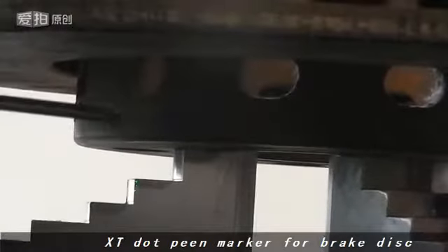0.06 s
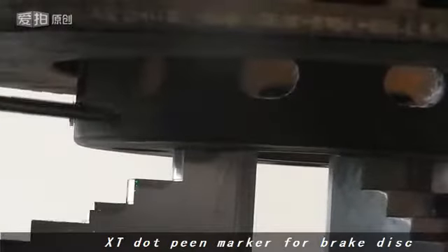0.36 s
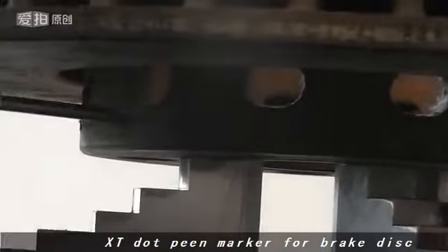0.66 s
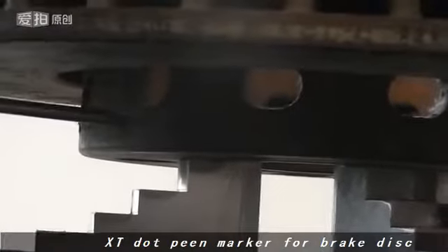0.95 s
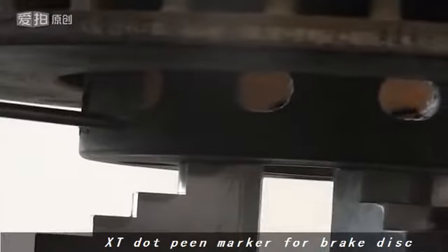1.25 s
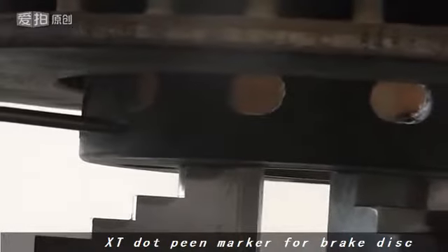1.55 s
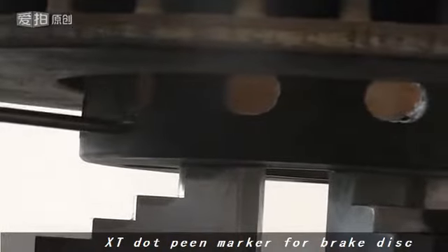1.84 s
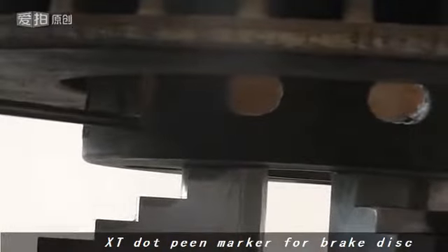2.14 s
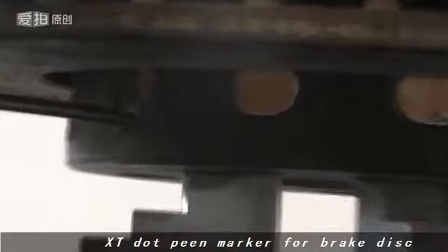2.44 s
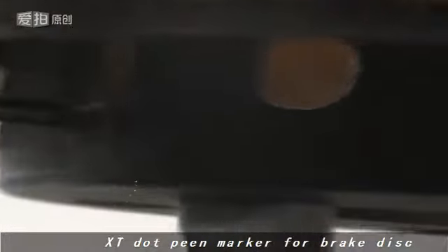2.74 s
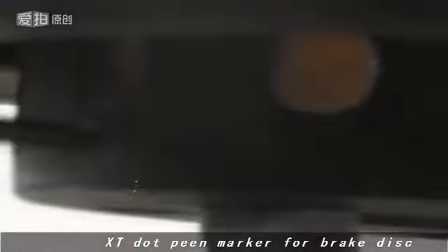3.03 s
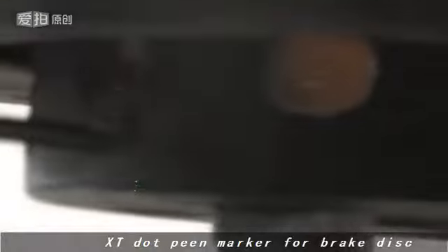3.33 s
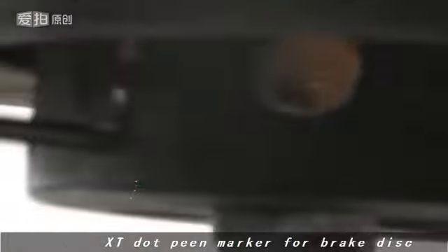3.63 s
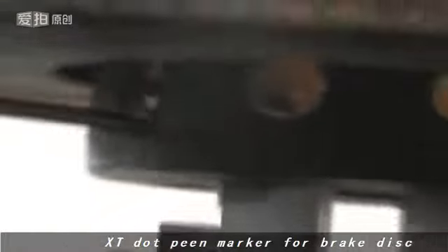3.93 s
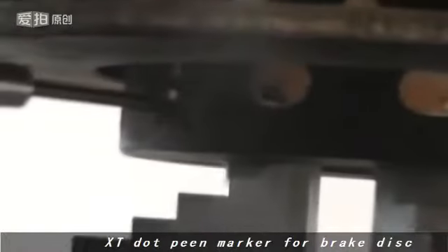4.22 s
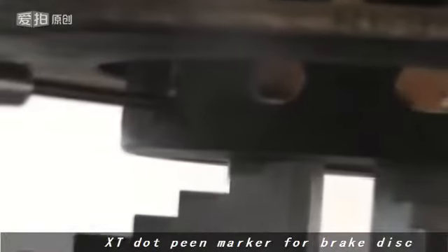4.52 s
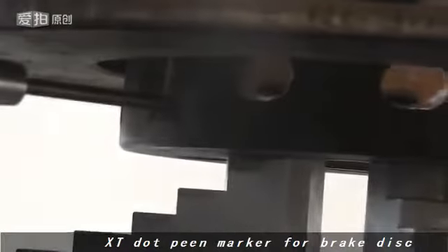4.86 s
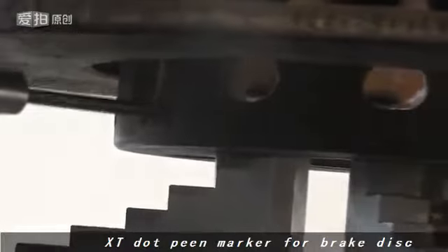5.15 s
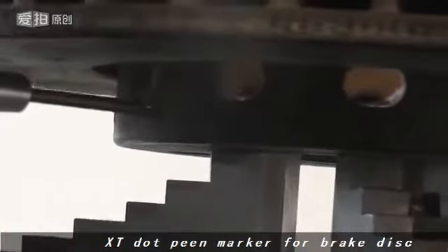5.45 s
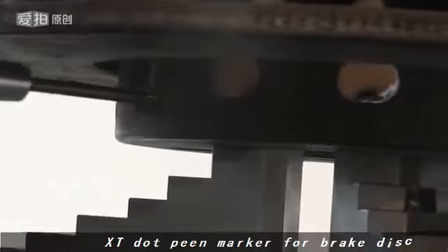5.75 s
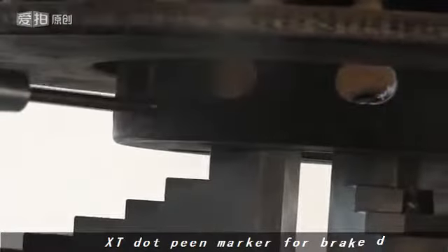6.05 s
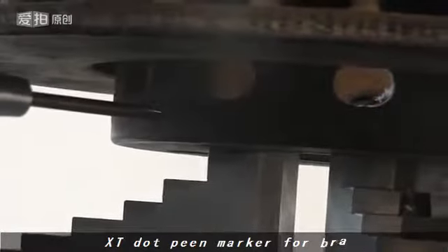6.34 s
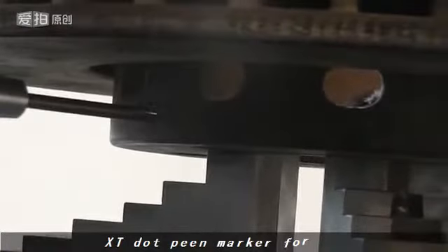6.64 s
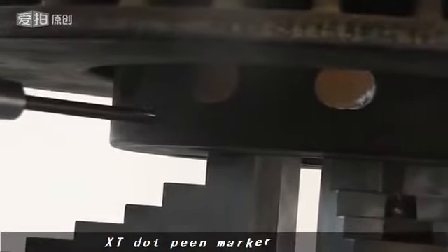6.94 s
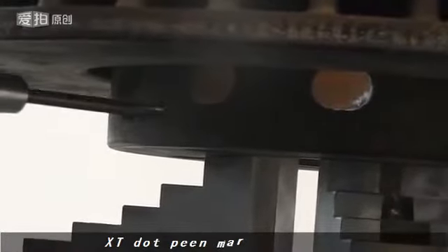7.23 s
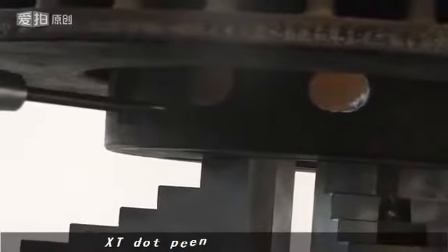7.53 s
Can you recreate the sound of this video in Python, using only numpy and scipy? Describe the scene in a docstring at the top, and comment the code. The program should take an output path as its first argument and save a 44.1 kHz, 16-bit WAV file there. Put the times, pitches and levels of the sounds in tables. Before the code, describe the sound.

A distant machine drones throughout in a slightly echoing workshop, with a faint hiss of leaking air. Close by, a pneumatic marker hammers a steel brake disc so fast that it makes a harsh buzz, with metallic ringing and bright spitting air. One burst cuts off right at the start. Others run from 0.8 to 1.4 seconds, 2.1 to 2.4 and 2.9 to 3.5, then two come almost joined between 4.2 and 4.9. Each opens with a dull knock and leaves a low boom. The drone dips under the bursts and swells back between them. A small positioning motor sounds a steady, low whine from 1.5 to 1.9 seconds and from 2.5 to 2.9. After the last burst, a soft venting hiss swells and fades by about 5.7 seconds. A faint click comes near 7 seconds, as the drone turns slightly rougher, continuing until about 8.

```python
"""A workshop: close by, a pneumatic dot peen marker stamps a brake disc in six bursts.
The stylus hammers about 131 times a second, ringing the steel and spitting air at each stroke.
Each burst opens with a knock and sets the frame booming; in two pauses a stepper motor sings.
A motor-driven machine drones throughout; late on, its colour shifts with the listening position.
Automatic gain control ducks the drone under each burst and lets it swell back in the pauses."""
import sys
import numpy as np
from scipy import signal
from scipy.fft import rfft, irfft
from scipy.io import wavfile
from scipy.ndimage import uniform_filter1d, minimum_filter1d

SR = 44100
rng = np.random.default_rng(int(sys.argv[2]) if len(sys.argv) > 2 else 0)


def to_wav(sig):
    """Store sig (one row per channel, or 1-D mono) as 16-bit WAV at the path in sys.argv[1].

    Samples outside -1..1 are clipped; the rate is SR.
    """
    pcm = np.clip(np.atleast_2d(sig), -1, 1) * 32767
    pcm = np.round(pcm).astype(np.int16)
    wavfile.write(sys.argv[1], SR, pcm.T)  # frames by channels


N = 343098
TIME = np.arange(N) / SR
BIN_HZ = np.fft.rfftfreq(N, 1 / SR)


# Each row: valve opening and shutting in seconds, knock in dB, frame boom in dB, stroke rate in Hz,
# relative blow strength in dB, relative exhaust level in dB.
BURSTS = [(-.5, 0.089, -36, -18, 131.9, -20, -21), (0.839, 1.388, -13, -26.5, 130.7, -22, -21.5),
          (2.051, 2.426, -11, -18.5, 132.1, -24, -23.5), (2.909, 3.494, -17.5, -24.5, 131.4, -22, -23),
          (4.154, 4.507, -14.5, -21, 129.5, -20.5, -21.5), (4.559, 4.926, -13, -25.5, 130.5, -21, -22)]

def marker(scatter_db=2.98, puff_cycles=0.22, leak=0.38, chatter=1.37, close_gain_db=19):
    """Each stroke shakes the head, strikes the steel and lets out a puff of air."""
    rate_hz, blow_db, exhaust_db = stylus_drive()
    turns = np.cumsum(rate_hz * (1 + .004 * wander(90))) / SR
    stroke, cycle = turns.astype(int), turns % 1
    size = amp(scatter_db * rng.standard_normal(2000))[stroke]
    puff = unit_rms(leak + size * np.minimum(cycle / 0.16, 1) * np.exp(-cycle / puff_cycles))
    impact = unit_rms(np.diff(stroke, prepend=0))
    skid = unit_rms(np.exp(-cycle / 0.084) * rng.standard_normal(N))  # the tip digs in
    blows = unit_rms(size * (impact + chatter * skid))
    force = amp(blow_db) * valve(rise_s=0.02, fall_s=0.0096)
    head = head_buzz(turns, rate_hz.mean()) + head_rattle(puff)
    air = amp(exhaust_db) * exhaust(puff)
    return amp(close_gain_db) * (force * head + steel_ring(force * blows) + air)


def stylus_drive(surge_s=.09, surge_hz=3, surge_blow_db=-2, surge_air_db=4, pace_drift=.004):
    """Air stored in the line opens each burst with faster, lighter strokes and more exhaust."""
    opens_s, _, _, _, rate_hz, blow_db, air_db = np.transpose(BURSTS)
    burst = np.maximum(np.searchsorted(opens_s, TIME) - 1, 0)
    surge = np.exp(-(TIME - opens_s[burst]) / surge_s)
    load = wander(16)  # varies along the path of a character
    return (rate_hz[burst] * (1 + pace_drift * wander(11)) + surge_hz * surge,
            blow_db[burst] + surge_blow_db * surge + 0.6 * load,
            air_db[burst] + surge_air_db * surge + 0.2 * load)


def valve(rise_s, fall_s):
    """Air pressure builds when the valve opens and dies away when it shuts."""
    return sum(ramp(on, rise_s) ** 2.2 * tail(off, fall_s) for on, off, *_ in BURSTS)


# Each row: multiple of the stroke rate, relative level in dB.
BUZZ_HARMONICS = [(1, -17), (2, -3.5), (3, -1.5), (4, -4.5), (5, -9), (6, -3.5), (7, -14.5), (8, -17),
                  (9, -18.5), (10, -17), (11, -22), (12, -20), (13, -32), (14, -16), (15, -26), (16, -20.5)]

def head_buzz(turns, rate_hz, gain_db=-1.5):
    """The marking head shakes at multiples of the stroke rate."""
    buzz = sum(amp(db) * partial(turns, round(k), rate_hz, NEAR_WIDTH, 1.4, waver_hz=8.6, drift_rad=0.12)
               for k, db in BUZZ_HARMONICS)
    return amp(gain_db) * unit_rms(buzz)


# Each row: frequency in Hz, relative density in dB.
RATTLE_SPECTRUM = [(41, -53), (70, -35), (198, -10.5), (260, -2), (336, 0), (394, -7), (455, -4),
                   (517, -2.5), (587, -5), (783, 0.5), (980, -6), (2040, -15), (3200, -40), (4160, -72),
                   (7040, -120)]

def head_rattle(puff, gain_db=-8):
    """The head rattles in time with the strokes."""
    return amp(gain_db) * puff * noise(RATTLE_SPECTRUM, NEAR_WIDTH)


# Each row: frequency in Hz, bandwidth in Hz, relative level in dB.
STEEL_MODES = [(790, 40, -1), (1185, 36, -4.5), (1290, 45, -4), (1415, 45, -8), (1820, 35, -10),
               (2068, 30, -3), (2570, 55, -8.5), (4120, 64, -8), (5500, 90, -5), (5740, 12, -9),
               (7560, 110, -6), (9930, 60, -8), (11250, 30, -6.5), (11400, 45, -8)]

def steel_ring(blows, spread_rad=0.065, gain_db=-8):
    """The blows ring the modes of disc and stylus, slightly out of phase left and right."""
    t = np.arange(SR // 4) / SR
    phases = rng.uniform(0, 2 * np.pi, (len(STEEL_MODES), 1, 1)) + spread_rad * np.array([[1], [-1]])
    ring = sum(amp(db) * np.sqrt(width) * np.exp(-np.pi * width * t) * np.sin(2 * np.pi * hz * t + phase)
               for (hz, width, db), phase in zip(STEEL_MODES, phases))
    ring /= np.linalg.norm(ring[0])
    return amp(gain_db) * signal.oaconvolve(blows[None], ring, axes=1)[:, :N]


# Each row: frequency in Hz, relative density in dB.
AIR_SPECTRUM = [(1650, -33), (2800, -19), (3200, -26), (3410, -7.5), (4030, -3.5), (4330, -4.5), (5570, 0),
                (6640, 0.5), (7480, 1.5), (9570, 2.5), (11400, 0), (11700, -8), (12200, 3), (14300, -10.5),
                (15000, -4)]

def exhaust(puff, gain_db=-1.5):
    """Spent air leaves in bright puffs while the valve is open."""
    return amp(gain_db) * puff * valve(rise_s=0.03, fall_s=0.0034) * noise(AIR_SPECTRUM, NEAR_WIDTH)


# Each row: frequency in Hz, relative density in dB.
KNOCK_SPECTRUM = [(25, -22), (70, -2), (150, 4), (400, 9.5), (900, -15), (2000, -30), (5000, -45)]

def piston_knocks(rise_s=0.0052, decay_s=0.015):
    """The first rush of air in each burst kicks the piston: a dull knock."""
    level = sum(amp(db) * ramp(on, rise_s) * tail(on + .02, decay_s) for on, _, db, *_ in BURSTS)
    return level * noise(KNOCK_SPECTRUM, NEAR_WIDTH)


def frame_boom(mode_hz=133, rise_s=0.52, decay_s=0.53):
    """A frame mode near the stroke rate builds up in each burst and booms on after it."""
    swing = np.zeros(N)
    for on, off, _, db, *_ in BURSTS:
        build_up = 1 - np.exp(-np.clip(TIME - on, 0, off - on) / rise_s)
        swing += amp(db) * build_up * tail(off, decay_s)
    return swing * np.sqrt(2) * np.sin(2 * np.pi * mode_hz * TIME + 0.32 * wander(8))


# Each row: start in seconds, stop in seconds, pitch in Hz, level in dB.
CARRIAGE_MOVES = [(1.45, 1.939, 298.5, -19), (2.497, 2.921, 307.5, -22)]

def carriage(fade_s=0.017):
    """The stepper motor sings while the head moves to the next character."""
    out = np.zeros(N)
    for start, stop, hz, db in CARRIAGE_MOVES:
        gate = np.clip(np.minimum(TIME - start, stop - TIME) / fade_s, 0, 1)
        turns = np.cumsum(hz * (1 + 0.016 * wander(30))) / SR
        out += amp(db) * gate * np.sin(2 * np.pi * turns)
    return out


# Each row: time in seconds, share of the second listening position from 0 to 1.
POSITION_BLEND = [(6.0, 0), (6.1, 0), (7.0, 0.2), (7.2, 0.36), (7.45, 0.85), (7.62, 0.74), (7.78, 0.9)]
# Each row: frequency in Hz, left minus right in dB.
MACHINE_PAN = [(100, 0), (650, 0.8), (900, -1), (4000, -2), (9000, -2), (11000, 0)]

def machine(shaft_hz=48.49):
    """A distant machine drones; late on, its colour shifts as heard from a second listening position."""
    blend = np.interp(TIME, *np.transpose(POSITION_BLEND))
    turns = np.cumsum(shaft_hz * (1 + .0006 * wander(12))) / SR
    sound = drone(turns, shaft_hz, blend) + rush(turns, blend) + air_leak(turns)
    pan = amp(at_hz(MACHINE_PAN, BIN_HZ) * np.array([[.5], [-.5]]))
    return irfft(rfft(sound) * pan, N)


# Each row: multiple of the shaft speed, level at first position in dB, level at second position in dB.
SHAFT_ORDERS = [(1, -47, -49), (2, -40, -40.5), (3, -42, -55), (4, -42, -39), (5, -34, -39),
                (6, -29.5, -56), (7, -26.5, -26.5), (8, -24, -21.5), (9, -32.5, -43), (10, -35.5, -25),
                (11, -37.5, -41), (12, -38, -41), (13, -36, -37), (14, -15.5, -23.5), (15, -28, -25.5),
                (16, -20, -21), (17, -28, -24), (18, -26, -29), (19, -45, -24.5), (20, -36.5, -40),
                (21, -43, -48), (22, -47, -37), (23, -49, -53), (24, -41, -32), (25, -30.5, -65),
                (26, -29.5, -36), (27, -57, -26), (28, -42.5, -55), (29, -42.5, -54), (30, -43.5, -44),
                (31, -48, -53), (32, -34, -32), (33, -45, -36), (34, -39, -39), (35, -41.5, -34.5),
                (36, -65, -50), (37, -43.5, -48)]

def drone(turns, shaft_hz, blend):
    """The shaft hums at multiples of its speed; standing waves give each position its own levels."""
    out = np.zeros((2, N))
    for order, first_db, second_db in SHAFT_ORDERS:
        level = (1 - blend) * amp(first_db) + blend * amp(second_db)
        out += level * partial(turns, round(order), shaft_hz, FAR_WIDTH, 1.04, waver_hz=7, drift_rad=0.028)
    return out


# Each row of both: frequency in Hz, relative density in dB.
RUSH_SPECTRUM = [(25, -38), (70, -27), (120, -6), (180, -6), (215, -6), (330, -3.5), (520, -5), (820, 3.5),
                 (1100, -3), (1550, -5.5), (2100, -15.5), (3000, -41.5), (5000, -59), (12000, -70)]
ROAR_SPECTRUM = [(400, -50), (680, -20.5), (790, 2), (870, -6), (1000, -9), (1800, -61.5)]

def rush(turns, blend, rush_db=-21, roar_db=-23, throb=0.25):
    """A rush that throbs twice a turn, with a rough band near 790 Hz at the second position."""
    broad = amp(rush_db) * noise(RUSH_SPECTRUM, FAR_WIDTH)
    roar = amp(roar_db) * blend * noise(ROAR_SPECTRUM, FAR_WIDTH)
    return unit_rms(1 + throb * np.cos(4 * np.pi * turns)) * (broad + roar)


# Each row: frequency in Hz, relative density in dB.
LEAK_SPECTRUM = [(1290, 0.5), (2200, -4), (2460, 5), (2780, -2.5), (3450, -2.5), (4320, 2.5), (4910, -3),
                 (5800, -2), (6400, -1), (7000, -3.5), (8050, -1.5), (8720, -3), (9700, -9), (10200, -7.5),
                 (10700, -16.5), (12000, -17.5), (13000, -33), (14000, -27.5), (15000, -37)]

def air_leak(turns, level_db=-31):
    """Leaking air hisses, pulsing faintly once and twice a turn."""
    pulse = 1 + 0.051 * np.cos(2 * np.pi * turns) + 0.036 * np.cos(4 * np.pi * turns)
    return amp(level_db + 0.72 * wander(25)) * pulse * noise(LEAK_SPECTRUM, FAR_WIDTH)


# Each row: frequency in Hz, relative density in dB.
VENT_SPECTRUM = [(2500, -27), (5000, 3), (8000, 1), (10000, -3), (12000, -24), (15000, -39)]

def venting(level_db=-31, start_s=4.89, rise_s=0.46, decay_s=0.2):
    """As the last burst ends, the air line empties with a hiss that swells and fades."""
    envelope = ramp(start_s, rise_s) * tail(start_s + rise_s, decay_s)
    return amp(level_db) * envelope * noise(VENT_SPECTRUM, FAR_WIDTH)


def tick(level_db=-34, start_s=6.96, decay_s=0.0085):
    """One faint, bright click."""
    return amp(level_db) * (TIME > start_s) * tail(start_s, decay_s) * noise(AIR_SPECTRUM, NEAR_WIDTH)


# Each row: frequency in Hz, reverberation time in seconds.
ROOM_T60 = [(60, .7), (130, 0.87), (280, 1), (600, 0.79), (2000, 1), (10000, 0.28)]
# Each row: frequency in Hz, send level in dB.
ROOM_SEND = [(60, -8), (130, 2), (270, -9.5), (600, -9), (2000, -14), (10000, -20)]

def room(x):
    """A diffuse tail in which the treble dies first."""
    hz, t, spectra = signal.stft(rng.standard_normal((2, 2 * SR)), SR, nperseg=1024)
    t60_s = at_hz(ROOM_T60, hz)[:, None]
    decay = amp(at_hz(ROOM_SEND, hz)[:, None] - 60 * t / t60_s)
    unit_energy = np.sqrt(2 * np.log(1000) / (t60_s * SR))
    mid, side = signal.istft(spectra * decay * unit_energy, SR, nperseg=1024)[1]
    response = np.array([mid + 0.11 * side, mid - 0.16 * side])
    return signal.fftconvolve(x.mean(0)[None], response, axes=1)[:, :N]


# Stereo width, near and far. Each row: frequency in Hz, side against mid in dB.
NEAR_WIDTH = [(30, -10), (100, -29), (500, -19.5), (1000, -21), (1600, -10), (2000, -57), (7000, -15.5),
              (8500, -12), (10000, -7.5), (11500, -5), (13000, -11)]
FAR_WIDTH = [(30, -18), (80, -23), (350, -23), (550, -14), (1100, -9.5), (2000, -7), (4000, -1.5),
             (8000, -0.5), (11000, 4)]

def noise(spectrum, width):
    """Coloured stereo noise with a mid of rms 1."""
    mid, side = rfft(rng.standard_normal((2, N))) * amp(at_hz(spectrum, BIN_HZ))
    mid, side = irfft(np.array([mid, side * amp(at_hz(width, BIN_HZ))]), N)
    return np.array([mid + side, mid - side]) / mid.std()


def partial(turns, order, base_hz, width, waver_db, waver_hz, drift_rad):
    """One wavering harmonic, out of phase left and right."""
    angle = 2 * np.pi * (order * turns + rng.random()) + drift_rad * np.sqrt(order) * wander(waver_hz)
    apart = np.arctan(amp(at_hz(width, order * base_hz))) * np.array([[1], [-1]]) * (-1) ** order
    return np.sqrt(2) * amp(waver_db * wander(waver_hz)) * np.cos(angle + apart)


def wander(rate_hz):
    """Random drift of rms about 1."""
    return 1.2 * np.interp(TIME * rate_hz, np.arange(4000), rng.standard_normal(4000))


def ramp(start_s, rise_s):
    """Linear rise from 0 to 1."""
    return np.clip((TIME - start_s) / rise_s, 0, 1)


def tail(start_s, decay_s):
    """1 until the start, then exponential decay."""
    return np.exp(-np.maximum(TIME - start_s, 0) / decay_s)


def at_hz(table, hz):
    """Interpolates a table on a log-frequency axis."""
    table_hz, values = np.transpose(table)
    return np.interp(np.log(hz + 1), np.log(table_hz + 1), values)


def amp(db):
    """Decibels to gain."""
    return 10 ** (np.asarray(db) / 20)


def unit_rms(x):
    """Scales to rms 1."""
    return x / np.sqrt(np.mean(x ** 2) + 1e-20)


def scene():
    """The marker and its echo in front of the droning machine."""
    near = marker() + piston_knocks()
    return near + room(near) + frame_boom() + machine() + carriage() + venting() + tick()


def record(dry, limit_db=-17, hold_s=0.083, recover_db_per_s=48, sense_hz=3500, cutoff_hz=15050):
    """Treble-keyed gain control (quick fall, short hold, slow recovery), clipping, then a low-pass."""
    treble = signal.sosfilt(signal.butter(2, sense_hz, "high", fs=SR, output="sos"), dry)
    power = uniform_filter1d((treble ** 2).mean(0), size=340)
    over_db = np.maximum(10 * np.log10(abs(power) + 1e-12) - limit_db, 0)
    half_hold = int(hold_s * SR / 2)
    held_db = -minimum_filter1d(-over_db, 2 * half_hold + 1, origin=half_hold)
    recovery_db = TIME * recover_db_per_s
    duck_db = np.maximum.accumulate(held_db + recovery_db) - recovery_db
    ducked = dry * amp(-uniform_filter1d(duck_db, size=100))
    lowpass = signal.firwin(511, cutoff_hz, window=("kaiser", 9), fs=SR)
    return signal.oaconvolve(np.clip(ducked, -1, 1), lowpass[None], "same")


dry = scene()
out = record(dry)
to_wav(out)
```